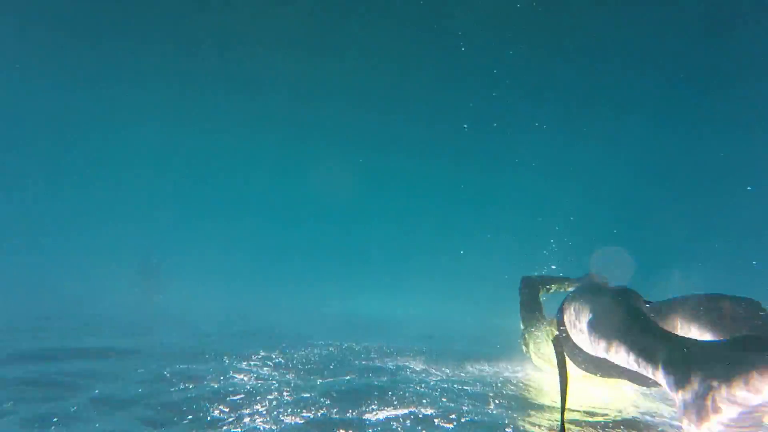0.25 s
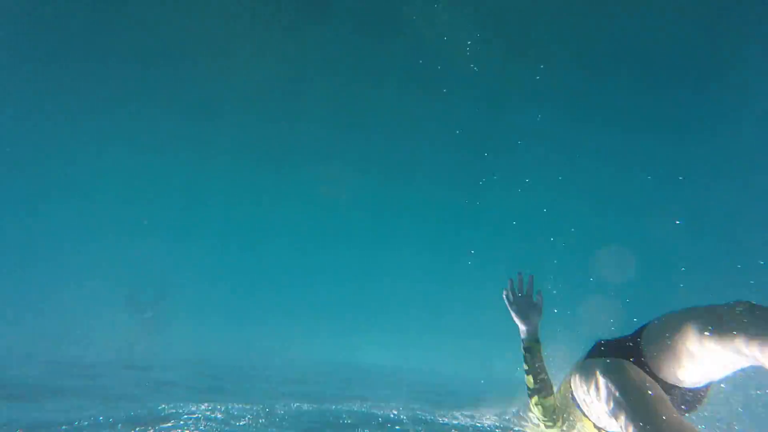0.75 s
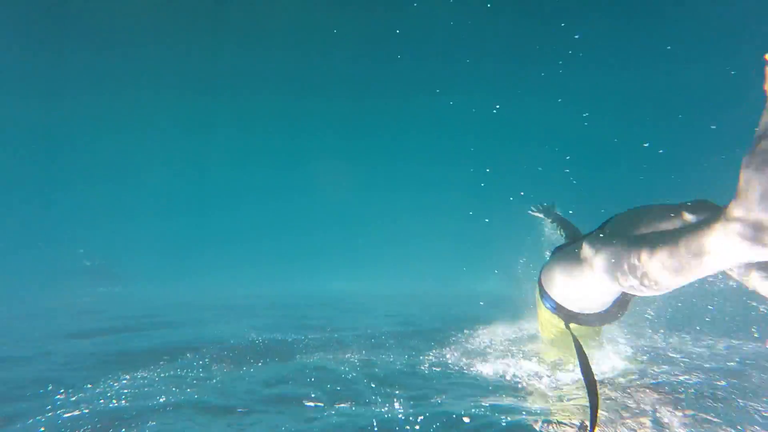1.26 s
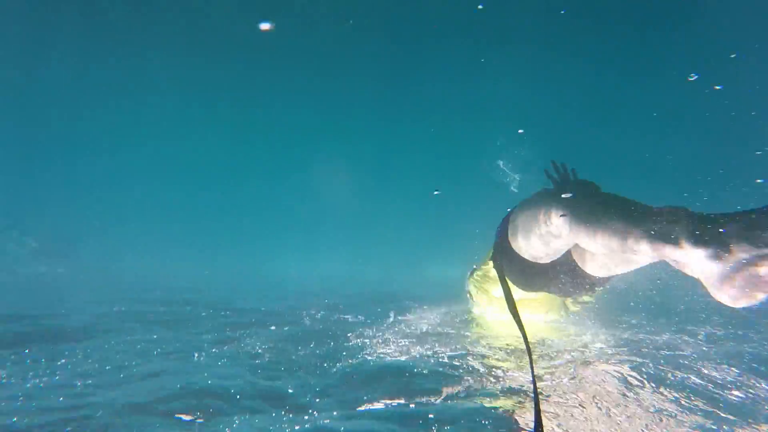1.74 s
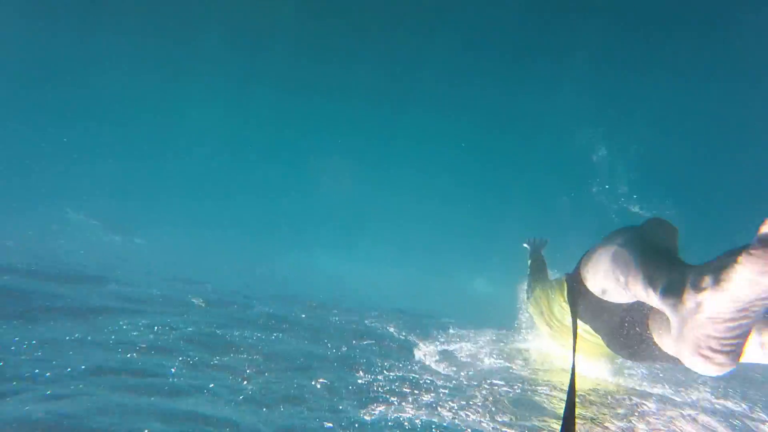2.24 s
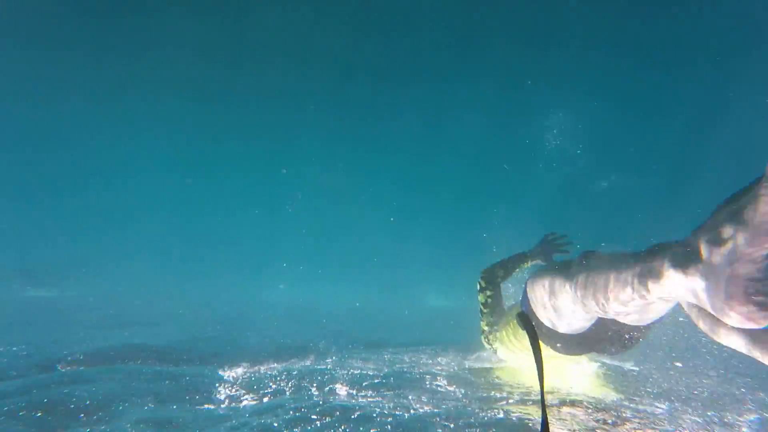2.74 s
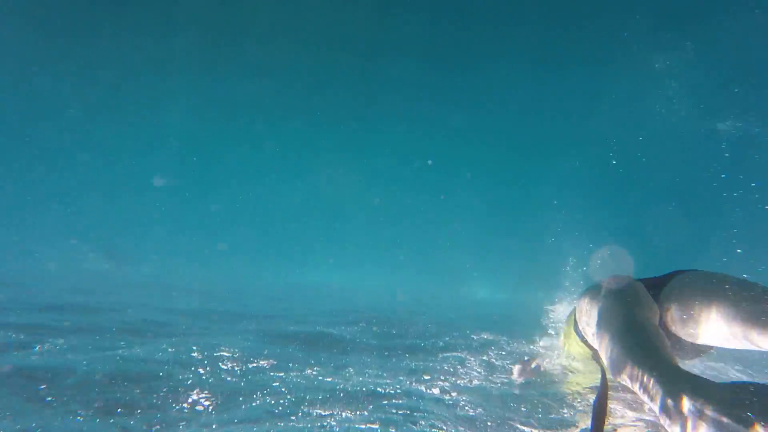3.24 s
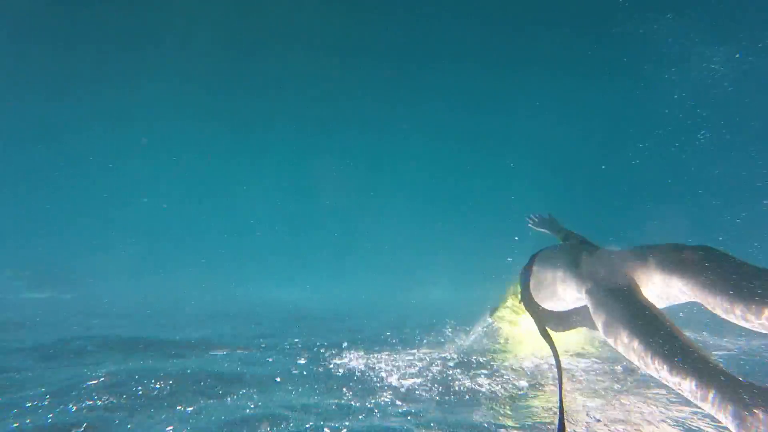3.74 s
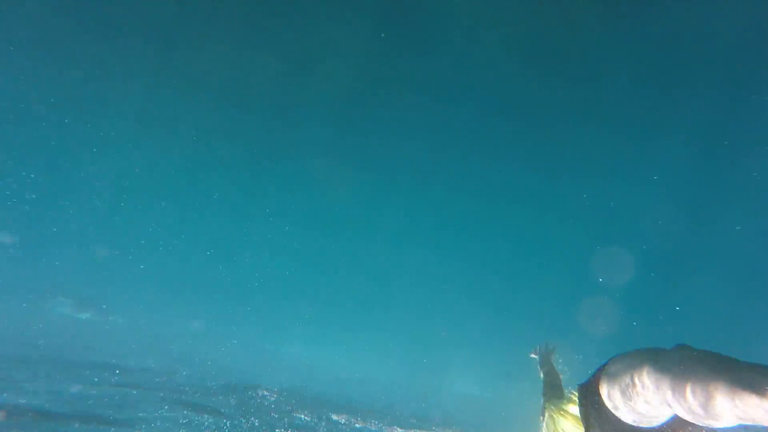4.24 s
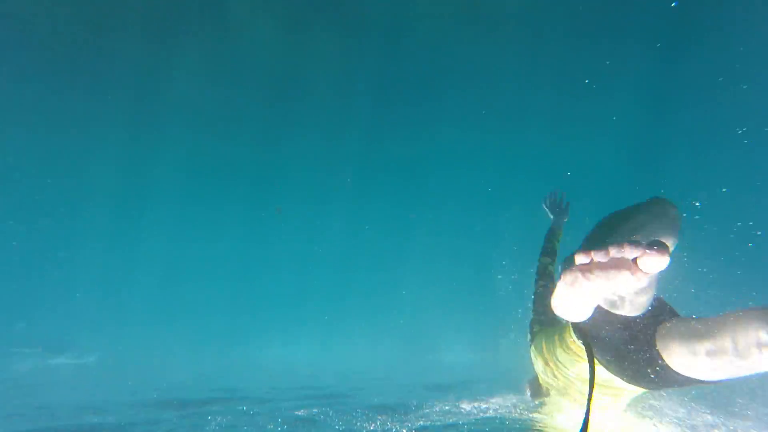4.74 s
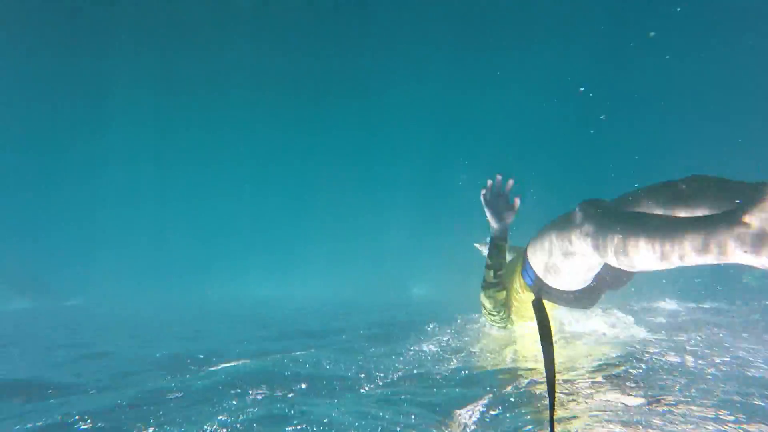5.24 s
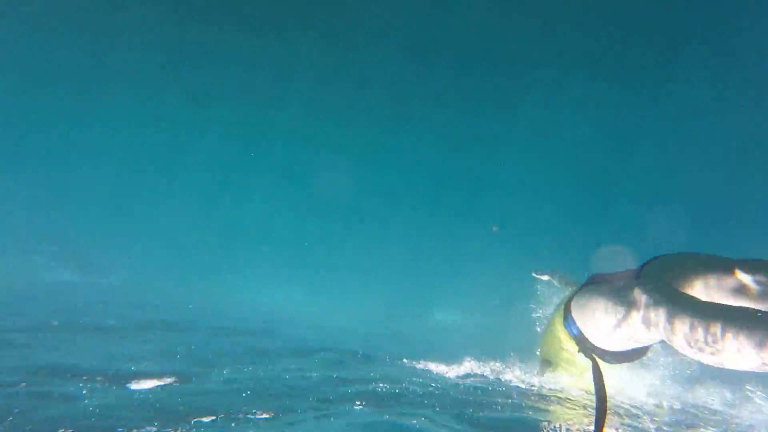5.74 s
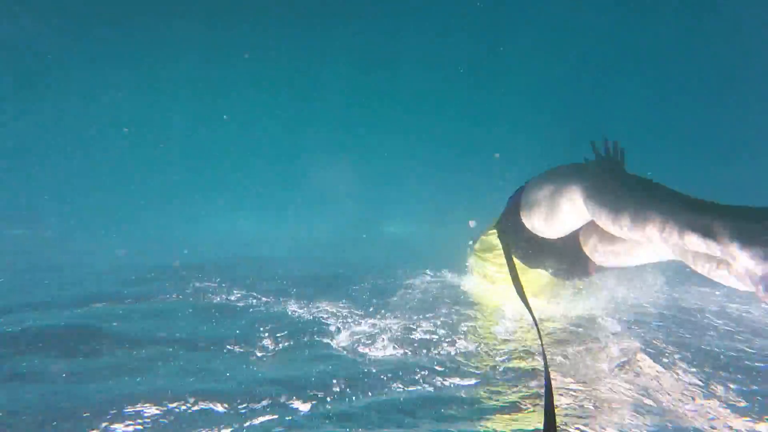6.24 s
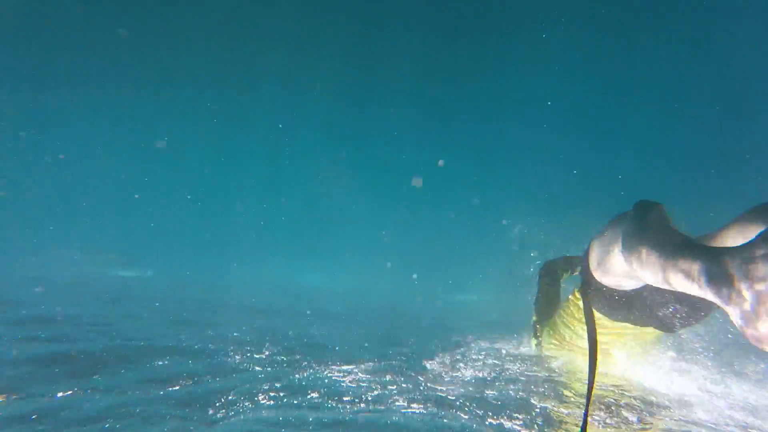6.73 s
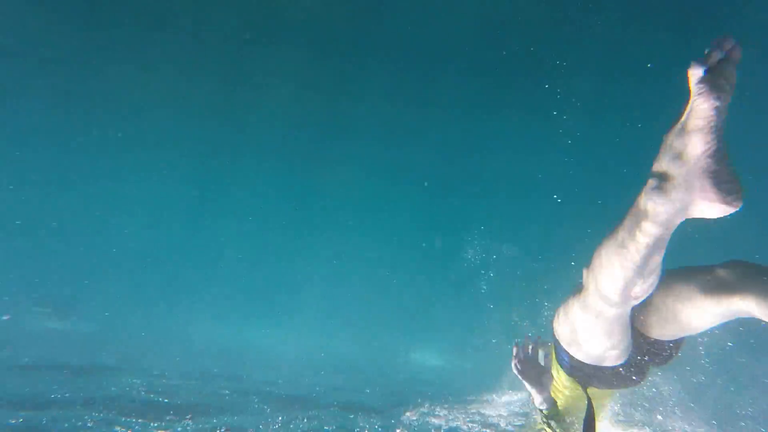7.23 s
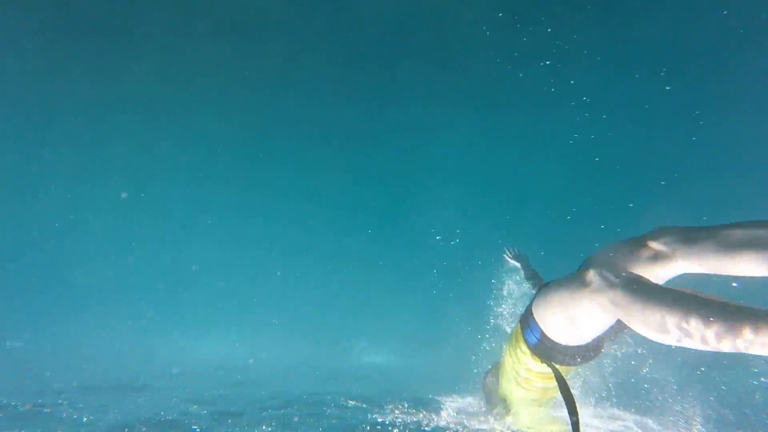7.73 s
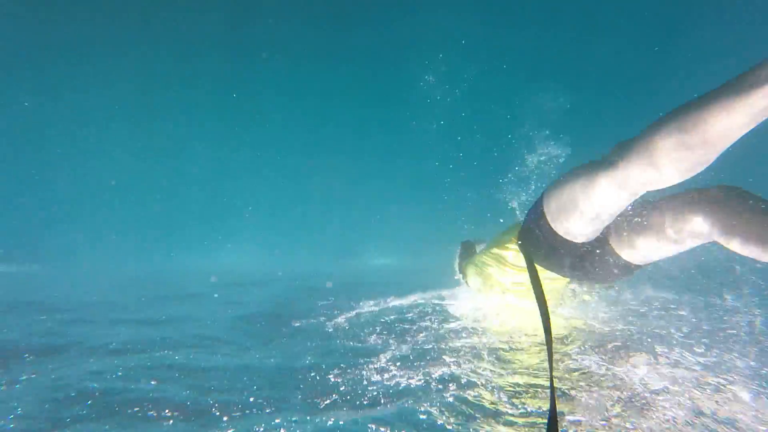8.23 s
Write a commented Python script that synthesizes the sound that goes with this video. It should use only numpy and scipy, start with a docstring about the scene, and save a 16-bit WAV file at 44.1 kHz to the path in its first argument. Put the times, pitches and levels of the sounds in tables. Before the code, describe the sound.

Muffled underwater churning as a swimmer's strokes and kicks thud, slap and bubble against a low water rumble with tiny crackling snaps.

```python
"""A crawl swimmer passes just ahead of a camera held under the sea surface in a waterproof housing.
From the start water rumbles past, tiny snaps, likely shrimp, crackle and the electronics whine faintly;
a stream of like-sized bubbles sings a wavering note that fades within the first second.
Arms and feet drive air under: clouds of decaying sines churn and fizz, pockets thud and slaps knock.
From about one second on, air pockets now and then shatter in a crisp spit; hollow modes colour the strokes."""
import sys
import numpy as np
from scipy import signal
from scipy.io import wavfile

SR = 44100
rng = np.random.default_rng(int(sys.argv[2]) if len(sys.argv) > 2 else 0)


def generate_wav(signal):
    """Clip the signal to [-1, 1] and save it as 16-bit WAV at the path in sys.argv[1]."""
    frames = np.transpose(np.atleast_2d(signal))
    scaled = np.clip(frames, -1, 1) * 32767
    pcm = np.round(scaled).astype(np.int16)
    wavfile.write(sys.argv[1], SR, pcm)


N = 373968
SWELL_CYCLES = 0.24  # time constant of a bubble's onset, in its own cycles


def amp(db):
    """Decibels to gain."""
    return 10 ** (np.asarray(db) / 20)


def unit(x):
    """Scales to rms 1."""
    return x / np.sqrt(np.mean(x ** 2) + 1e-20)


def curve(rows, s):
    """Reads a table of (s, value) at the times s."""
    return np.interp(s, *np.transpose(rows))


def add(mix, s, sound):
    """Mixes a sound in at time s."""
    part = mix[max(0, round(s * SR)):][:len(sound)]
    part += sound[:len(part)]


def colour(x, points):
    """Filters causally (minimum phase) to a spectrum given as (Hz, dB) points."""
    size = 2 ** 15
    hz, db = np.transpose(points)
    bins_hz = abs(np.fft.fftfreq(size, 1 / SR))
    bins_db = np.interp(np.log(bins_hz + 1), np.log(hz + 1), db)
    log_gain = np.log(amp(bins_db))
    # the Hilbert transform of the log gain supplies the phase
    response = np.fft.ifft(np.exp(np.conj(signal.hilbert(log_gain)))).real
    return signal.oaconvolve(x, response[:size // 2])[:len(x)]


def spurts(db, hz):
    """A gain that swells and sinks at random by db rms, up to about hz times a second."""
    slow = signal.sosfilt(signal.butter(2, hz, fs=SR, output="sos"), rng.standard_normal(N))
    return amp(db * unit(slow))


def surge(t, s, rise_s, hold_s, fall_db_per_s):
    """A gain that builds up to full strength at time s, holds, then dies away."""
    rise = np.exp(-(np.minimum(t - s, 0) / rise_s) ** 2)
    fall = amp(-fall_db_per_s * np.maximum(t - s - hold_s, 0))
    return rise * fall


def pile_up(t, events, rise_s, fall_db_per_s, floor_db):
    """Level in dB of overlapping surges (s, hold s, dB), summed as power over a steady floor."""
    coarse = t[::100]
    power = sum((amp(db) * surge(coarse, s, rise_s, hold_s, fall_db_per_s)) ** 2
                for s, hold_s, db in events)
    return 10 * np.log10(np.interp(t, coarse, power) + amp(floor_db) ** 2)


def bubble(hz, t60, swell, glide):
    """Trapped air rings and dies away; its pitch creeps up by glide per t60 as it nears the surface."""
    t = np.arange(int(1.2 * t60 * SR) + 2) / SR
    turns = hz * t * (1 + glide * t / t60 / 2)
    onset = 1 - np.exp(-t / max(swell, 1e-4))
    decay = np.exp(-np.log(1000) * t / t60)
    return onset * decay * np.sin(2 * np.pi * turns)


def swarm(per_s, centre_hz, octaves, cycles, spread_db, glide):
    """A cloud of bubbles of random size and level, each with a t60 of half to twice the given cycles."""
    out = np.zeros(N)
    for when, a, b, c, d in rng.random((int(per_s * N / SR), 5)):
        hz = centre_hz * 2 ** (octaves * (a + b - 1))
        t60 = cycles * 2 ** (2 * c - 1) / hz
        add(out, when * N / SR, amp(spread_db * d) * bubble(hz, t60, .5 / hz, glide))
    return out


def housing(x, wall_hz=960):
    """The shell rings at its hollow modes and muffles what is higher."""
    # resonances of the hollow shell: mode_hz, width_hz, gain_db over the direct path
    hollow_modes = [(442, 135, -5.5), (581.4, 60.4, 10.5), (1320, 52, 4.5)]
    modes = sum(amp(db) * signal.lfilter(*signal.iirpeak(hz, hz / width, fs=SR), x)
                for hz, width, db in hollow_modes)
    return signal.sosfilt(signal.butter(3, wall_hz, fs=SR, output="sos"), x + modes)


def flow(t, buffet_db=-1, sway_db=-32, follow=0.65):
    """Each kick sends eddies that buffet the housing in uneven shoves, over a slow sway of pressure."""
    # kicks whose wake pushes on the housing: peak_s (push at full strength), push_db (before buffet_db)
    kicks = [(-.05, -40.5), (.49, -39), (0.882, -34.5), (1.42, -35), (1.671, -37), (1.859, -33),
             (2.152, -41.5), (2.46, -40), (2.861, -40.5), (4.049, -36), (4.251, -32.5), (4.59, -35),
             (4.949, -39.5), (5.271, -41.5), (5.601, -40), (6.049, -34), (6.771, -38), (7.121, -41),
             (7.501, -37), (7.879, -41.5), (8.179, -39.5)]
    # spectrum of the slow sway: freq_hz, density_db (relative, per Hz)
    sway_spectrum = [(3, -19.5), (7, 9), (15, -5.5), (30, -15), (50, -18), (80, -19), (200, -49.5),
                     (600, -84)]
    # spectrum of the buffeting: freq_hz, density_db (relative, per Hz)
    buffet_spectrum = [(20, -24), (50, -2), (75, -14), (105, 5), (125, -9.5), (150, -13), (220, -19),
                       (400, -35), (1200, -94.5)]
    hold_s = 0.038
    # the floor is the push of the water between kicks
    push_db = pile_up(t, [(s, hold_s, db) for s, db in kicks],
                      rise_s=0.085, fall_db_per_s=45.5, floor_db=-49.5)
    shoves = spurts(db=3.5, hz=7.8) * rng.standard_normal(N)
    buffet = amp(push_db + buffet_db) * unit(colour(shoves, buffet_spectrum))
    sway_level = sway_db + follow * (push_db - push_db.mean())
    sway = amp(sway_level) * unit(colour(rng.standard_normal(N), sway_spectrum))
    return buffet + sway


def snap(hz, ring_s=0.00085, scatter=1.09, echo=0.42, echo_s=0.001483):
    """A sharp tick, briefly smeared by the shell, and its upside-down echo off the surface."""
    t = np.arange(SR // 80) / SR
    ring, path = rng.random(2)  # each snap has its own decay, smear and echo delay (echo_s at most)
    tick = np.exp(-t / (ring_s * (.5 + ring))) * np.sin(2 * np.pi * hz * t)
    smear = np.exp(-t / (ring_s * (.5 + 2 * path))) * rng.standard_normal(len(t))
    direct = tick + scatter * smear
    return direct - echo * np.interp(t - echo_s * path, t, direct, left=0)


def patter(per_s, spread_db, most, count=40):
    """Many snaps at random moments, in loose flurries, most of them far and faint."""
    when, size, kind = rng.random((3, N))
    at = np.flatnonzero(when < per_s / SR * spurts(db=2.2, hz=16))
    kinds = [snap(hz) for hz in np.geomspace(2400, 6500, count)]
    out = np.zeros(N)
    for i in at:
        level_db = spread_db * min(-np.log(size[i] + 1e-12), most)  # few are loud
        add(out, i / SR, amp(level_db) * kinds[int(kind[i] * count)])
    return out


def crackle(far_db=-57.0, near_db=1.5, hiss_db=-62, crack_db=-11, crack_s=0.0002):
    """Snaps near and far over their distant hiss; only near ones keep a bright crack."""
    # the nearest snaps: start_s, level_db (before near_db and crack_db), pitch_hz
    near_snaps = [(0.039, -30, 2740), (0.083, -33.5, 3380), (0.391, -34, 3000), (0.7587, -35.5, 2400),
                  (1.0627, -32.5, 3350), (1.4002, -32.5, 2660), (1.406, -35.5, 4240), (1.5114, -26.5, 3330),
                  (1.533, -36.5, 2950), (1.6437, -37, 2840), (1.818, -38, 3200), (1.9078, -38, 2880),
                  (2.0634, -33.5, 3770), (2.463, -28, 3260), (2.8289, -34.5, 3790), (3.1114, -29.5, 2480),
                  (3.2977, -38, 5630), (3.4342, -30, 4000), (3.7805, -31, 2400), (4.563, -33, 2340),
                  (5.302, -34, 3130), (5.4833, -32, 3140), (6.0891, -33.5, 2650), (6.122, -24, 2500),
                  (6.2033, -31.5, 4560), (6.2236, -27, 3250), (6.5882, -32, 4630), (6.609, -39, 3270),
                  (6.621, -25, 3300), (7.1053, -32, 2430), (7.442, -32.5, 3030), (7.635, -30, 4700),
                  (7.8, -33, 2670), (8.0813, -32, 2650), (8.4032, -31.5, 2670), (8.4364, -28.5, 2600)]
    # spectrum of all snaps and their hiss: freq_hz, density_db (relative, per Hz)
    snap_spectrum = [(600, -23), (1500, -5), (1800, 0.5), (2050, -3.5), (2500, 1), (3300, 0), (4800, -0.5),
                     (6300, -3), (7200, -9.5), (9600, -16), (10800, -21.5), (13300, -20), (15500, -54)]
    # spectrum of the bright crack of a near snap: freq_hz, density_db (relative, per Hz)
    crack_spectrum = [(3000, -51), (6000, -9), (9600, -31), (10800, -22.5), (13000, -19.5), (15500, -3)]
    near = np.zeros(N)
    t = np.arange(SR // 100) / SR
    for s, db, hz in near_snaps:
        tick = colour(snap(hz), snap_spectrum)
        crack = colour(np.exp(-t / crack_s) * rng.standard_normal(len(t)), crack_spectrum)
        add(near, s, amp(db + near_db) * tick / abs(tick).max())
        add(near, s, amp(db + crack_db) * crack / abs(crack).max())
    far = amp(far_db) * unit(colour(patter(per_s=160, spread_db=5.8, most=3.3), snap_spectrum))
    hiss = amp(hiss_db) * unit(colour(rng.standard_normal(N), snap_spectrum))
    return near + far + hiss


def whine(hz=9650, width_hz=25, db=-85):
    """A very faint, thin whine of the camera's electronics, made of narrow-band noise."""
    return amp(db) * unit(signal.lfilter(*signal.iirpeak(hz, hz / width_hz, fs=SR), rng.standard_normal(N)))


def stream(t):
    """Bubbles of like size follow so closely that they merge into a wavering note, soon gone."""
    # fade of the stream: time_s, level_db (before the balance of its notes)
    stream_fade = [(0, -33.5), (.62, -33.5), (.8, -84), (1, -100)]
    # its two bubble sizes: centre_hz, spread_octaves, balance_db
    stream_notes = [(554.7, 0.12, 5.5), (378, 0.054, 4)]
    notes = sum(amp(db) * unit(swarm(per_s=89, centre_hz=hz, octaves=octaves, cycles=38,
                                     spread_db=0.0, glide=0.0078))
                for hz, octaves, db in stream_notes)
    return amp(curve(stream_fade, t)) * unit(housing(notes))


def simmer(t):
    """Between plunges, small short-lived bubbles keep nudging the hollow note of the housing."""
    # small bubbles that linger: time_s, level_db
    linger = [(2.4, -50.5), (5.1, -49.5), (8.48, -47.5)]
    pops = swarm(per_s=420, centre_hz=644.4, octaves=0.89, cycles=12.8, spread_db=19.5, glide=0)
    return amp(curve(linger, t)) * unit(housing(pops))


def air(t):
    """Levels in dB of small and large bubbles and foam: each plunge adds some, and they clear as they rise."""
    # a limb drives a cloud of air under (levels before each layer's own trim): # peak_s (moment of full
    # strength), hold_s, small_bubbles_db, large_bubbles_db, foam_db
    plunges = [(0, 0.0072, -32.5, -35, -49.5), (0.176, 0.12, -38, -55, -74), (0.598, 0.26, -40, -44.5, -55),
               (0.957, 0.16, -34.5, -39.5, -55), (1.293, 0.22, -47, -47.5, -65),
               (1.643, 0.038, -37, -45.5, -72), (2.875, 0.15, -46, -46.5, -57.5),
               (3.376, 0.24, -45, -44, -59), (3.683, 0.16, -43.5, -44.5, -58),
               (3.927, 0.17, -35.5, -36.5, -54.5), (4.215, 0.11, -37, -37.5, -62.5),
               (4.548, 0.047, -37.5, -42, -62), (4.92, 0.12, -42, -48, -60), (6.026, 0.071, -44, -54, -59),
               (7.154, 0.016, -52, -43.5, -66), (7.485, 0.057, -44, -47.5, -57.5)]
    rise_s = 0.042
    bubbles_clear_db_per_s, foam_clear_db_per_s = 77, 83
    linger_cloud_db, linger_foam_db = -60.5, -63  # what remains between plunges
    s, hold_s, small, large, froth = np.transpose(plunges)
    return (pile_up(t, zip(s, hold_s, small), rise_s, bubbles_clear_db_per_s, linger_cloud_db),
            pile_up(t, zip(s, hold_s, large), rise_s, bubbles_clear_db_per_s, linger_cloud_db),
            pile_up(t, zip(s, hold_s, froth), rise_s, foam_clear_db_per_s, linger_foam_db))


def churn(small_level, large_level, foam_level, large_db=-2, rush_db=6, rush_hz=850, rush_q=0.23):
    """Two bubble clouds swell with each plunge; a soft rush of noise lies under the foam."""
    small = swarm(per_s=320, centre_hz=676.6, octaves=0.725, cycles=45, spread_db=28, glide=0.094)
    large = swarm(per_s=150, centre_hz=344.7, octaves=0.762, cycles=16.0, spread_db=13.5, glide=0.081)
    rush = signal.lfilter(*signal.iirpeak(rush_hz, rush_q, fs=SR), rng.standard_normal(N))
    return (amp(small_level) * unit(housing(small))
            + amp(large_level + large_db) * unit(housing(large))
            + amp(foam_level + rush_db) * unit(housing(rush)))


def foam(level, fizz_db=0.44, plips_db=-12, plinks_db=-11, plip_t60=0.028):
    """Tiny ringing bubbles merge into a wavering fizz; a few close by ring out, in two sizes."""
    # spectrum of the fizz: freq_hz, density_db (relative, per Hz)
    fizz_spectrum = [(500, -9), (900, -10.5), (1550, -10), (1800, -0.5), (2050, -5), (2500, 4.5), (3500, 2),
                     (6000, -4), (8000, -27.5), (14000, -57)]
    # the nearest tiny bubbles that ring out of the foam: start_s, level_db, pitch_hz
    near_plips = [(.584, -32, 2440), (.705, -24, 2580), (1.019, -30.5, 2615), (1.114, -31.5, 2620),
                  (1.403, -25, 1005), (4.53, -34, 1310), (4.563, -33, 1310), (5.392, -32.5, 1310),
                  (6.981, -34.5, 1080), (7.391, -37, 1350), (7.4185, -34.5, 2560), (7.492, -36, 1270),
                  (7.572, -43, 1290), (8.06, -33, 1295)]
    cloud = swarm(per_s=1500, centre_hz=2050, octaves=1.6, cycles=40, spread_db=27, glide=.03)
    cloud = cloud * spurts(db=1.5, hz=18)
    fizz = unit(colour(cloud, fizz_spectrum))
    plips = unit(swarm(per_s=28, centre_hz=2566, octaves=0.28, cycles=76, spread_db=28.0, glide=0.024))
    plinks = unit(swarm(per_s=13, centre_hz=1262, octaves=0.11, cycles=37, spread_db=25.0, glide=0.035))
    out = amp(level) * (amp(fizz_db) * fizz + amp(plips_db) * plips + amp(plinks_db) * plinks)
    for s, db, hz in near_plips:
        add(out, s, amp(db) * bubble(hz, plip_t60, 4 / hz, glide=0.025))
    return out


def strokes(glide=0.0084, spray_db=-25, spray_s=0.013, rebound=0.75):
    """The large bubbles, and slaps: one short swing of pressure and a burst of spray."""
    # the nearest air pockets and bubbles: start_s, level_db (before the housing), pitch_hz, t60_s
    pockets = [(.04, -32, 883, 0.13), (0.084, -21.5, 558.4, 0.16), (.155, -30, 645, 0.088),
               (.245, -24.5, 480, 0.055), (.255, -26.5, 633, .04), (.323, -32.5, 541, 0.29),
               (.347, -32.5, 792, 0.082), (.43, -35, 734, 0.049), (.52, -24.5, 528, 0.051),
               (0.588, -20.5, 362, 0.098), (0.597, -19, 200, 0.37), (.698, -23.5, 393, 0.11),
               (.706, -27.5, 580, 0.098), (.797, -29.5, 484, 0.093), (0.816, -15.5, 92, 0.16),
               (.951, -29, 516, 0.089), (.968, -21.5, 401, 0.14), (0.984, -19, 270, 0.027),
               (1.04, -17, 745, 0.049), (1.041, -22.5, 1420, 0.047), (1.11, -20, 548, 0.072),
               (1.224, -26, 453, 0.074), (1.311, -29, 900, 0.045), (1.546, -18.5, 548, 0.036),
               (1.655, -36, 796, 0.071), (1.787, -34, 554, 0.067), (1.796, -25.5, 313, 0.071),
               (1.853, -26.5, 504, 0.1), (1.883, -27.5, 98, 0.16), (1.949, -35, 620, 0.028),
               (2.607, -32.5, 503, 0.11), (2.636, -45, 974, 0.12), (2.861, -25.5, 597, 0.1),
               (2.88, -16, 373, 0.048), (2.981, -32.5, 709, 0.17), (3.004, -29.5, 645, 0.098),
               (3.054, -27.5, 604, 0.02), (3.195, -27.5, 650, 0.02), (3.425, -31, 408, 0.12),
               (3.45, -41, 848, 0.1), (3.735, -28, 300, 0.23), (3.79, -31, 700, 0.036),
               (3.853, -12.5, 85.5, 0.48), (3.905, -30, 795, .06), (3.969, -29.5, 587, 0.098),
               (4.235, -30, 848, 0.065), (4.25, -24, 157, 0.058), (4.323, -23.5, 340, 0.042),
               (4.434, -30, 750, 0.029), (4.612, -21, 364, 0.049), (4.67, -24.5, 368, 0.043),
               (4.862, -33.5, 523, 0.046), (4.945, -29, 634, 0.042), (5.204, -35, 713, 0.037),
               (5.391, -29, 940, 0.034), (5.435, -37.5, 564, 0.059), (5.675, -29.5, 776, 0.095),
               (5.795, -29.5, 860, 0.14), (5.838, -18, 99, 0.19), (5.922, -33.5, 630, 0.047),
               (5.989, -22.5, 840, 0.056), (6.022, -26, 612, 0.055), (6.041, -14.5, 116, 0.05),
               (6.629, -25.5, 97.3, 0.15), (6.85, -23, 580, 0.014), (7.37, -17, 104, 0.19),
               (7.394, -31, 650, 0.051), (7.549, -39, 630, 0.086), (7.829, -36, 597, 0.058),
               (7.861, -28, 920, 0.026), (7.918, -34.5, 655, 0.11)]
    # slaps of a hand or foot, a cavity snapping shut: centre_s (middle of the swing), level_db (before the
    # housing), centre_hz
    slaps = [(.508, -20.5, 460), (.54, -21.5, 706), (.701, -19, 600), (1.112, -29, 400), (1.787, -31, 420),
             (2.3985, -26.5, 466), (2.886, -18, 503), (3.854, -24.5, 565), (4.277, -28, 422),
             (4.613, -19, 354), (4.8265, -21.5, 342), (5.033, -28.5, 400), (5.797, -26, 594),
             (5.9895, -12.5, 500), (5.993, -18, 538), (6.023, -18.5, 640), (6.717, -27.5, 415),
             (6.778, -25.5, 474), (6.8053, -22, 407), (7.364, -27, 320), (7.3911, -17, 595),
             (7.533, -24.5, 347), (8.059, -31.5, 560)]
    out = np.zeros(N)
    for s, db, hz, t60 in pockets:
        add(out, s, amp(db) * bubble(hz, t60, SWELL_CYCLES / hz, glide))
    t = np.arange(SR // 20) / SR
    spray_band = signal.butter(2, [600, 2500], "band", fs=SR)
    for s, db, hz in slaps:
        u = np.pi * hz * t - np.pi  # zero one cycle in, so the swing centres on s
        swing = (2 * rebound * u ** 2 - 1) * np.exp(-u ** 2)
        add(out, s - 1 / hz, amp(db) * swing)
        spray = unit(signal.lfilter(*spray_band, rng.standard_normal(len(t))))
        add(out, s, amp(db + spray_db) * np.exp(-t / spray_s) * spray)
    return out


def bursts(low_hz=1300, high_hz=3700, cycles=20, count=24):
    """An air pocket shatters: bubbles of every small size start almost together in a crisp spit."""
    # shattering pockets: start_s, peak_db, birth_s (time within which the bubbles are born)
    shatters = [(1.037, -35, 0.012), (3.109, -36.5, 0.015), (3.546, -42, .018), (3.735, -34, 0.012),
                (7.359, -37, 0.013), (7.516, -42, 0.011), (7.575, -34, 0.0091), (8.059, -34.5, .016)]
    out = np.zeros(N)
    for s, db, length in shatters:
        spit = np.zeros(SR // 10)
        for hz, delay in zip(np.geomspace(low_hz, high_hz, count), rng.random(count) ** 2):
            add(spit, length * delay, bubble(hz, cycles / hz, SWELL_CYCLES / hz, glide=0.053))
        add(out, s, amp(db) * spit / abs(spit).max())
    return out


def scene():
    """Everything that reaches the one microphone inside the housing."""
    t = np.arange(N) / SR
    small, large, froth = air(t)
    water = flow(t) + crackle() + whine()
    clouds = stream(t) + simmer(t) + churn(small, large, froth) + foam(froth)
    hits = housing(strokes()) + bursts()
    return (water + clouds + hits)[None]


def record(dry, top_hz=15200):
    """Limits the band with a steep linear-phase low-pass."""
    return signal.oaconvolve(dry, signal.firwin(401, top_hz, window=("kaiser", 9), fs=SR)[None], "same")


dry = scene()
out = record(dry)
generate_wav(out)
```